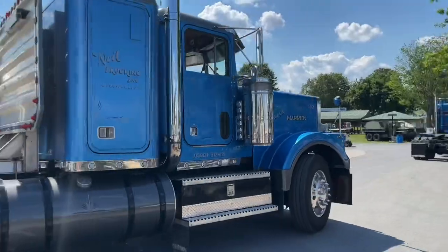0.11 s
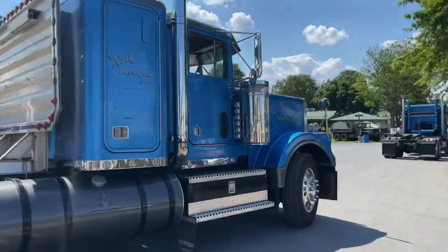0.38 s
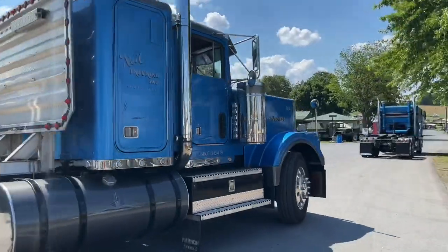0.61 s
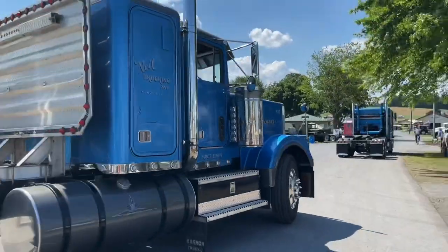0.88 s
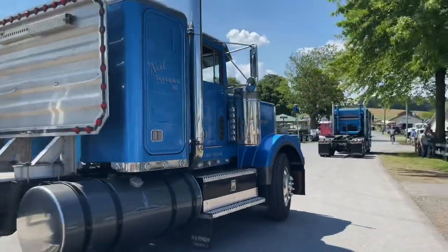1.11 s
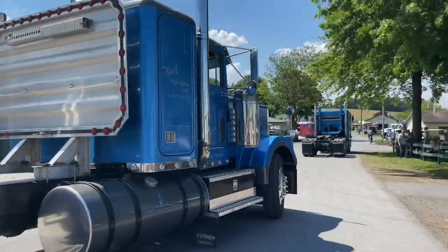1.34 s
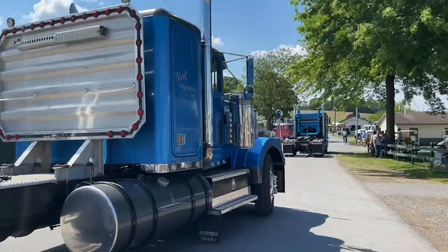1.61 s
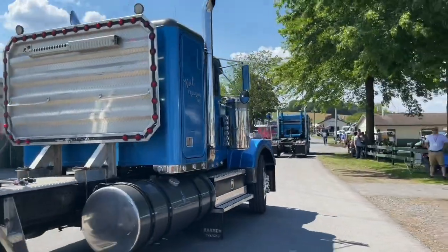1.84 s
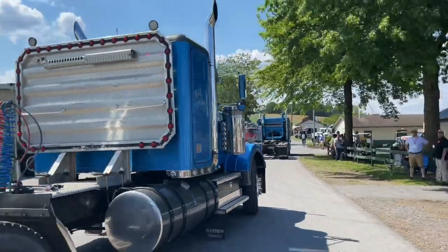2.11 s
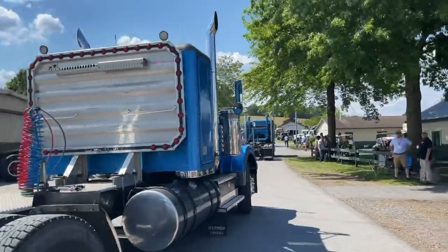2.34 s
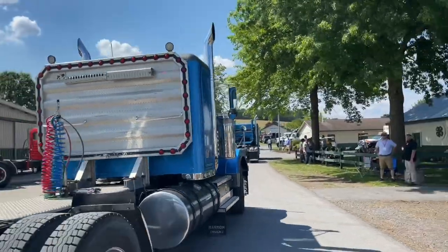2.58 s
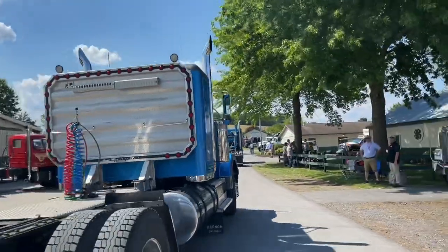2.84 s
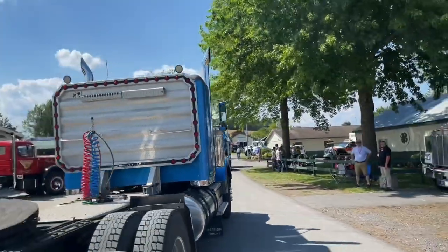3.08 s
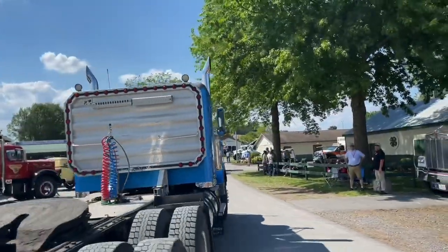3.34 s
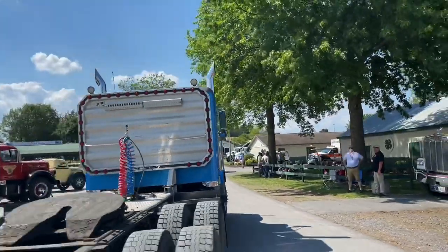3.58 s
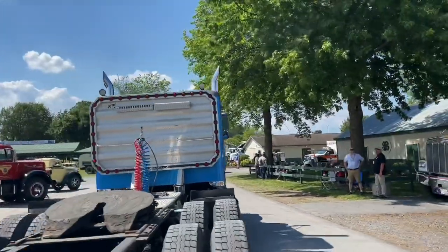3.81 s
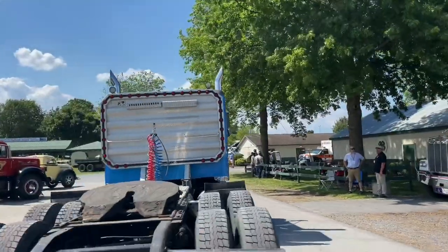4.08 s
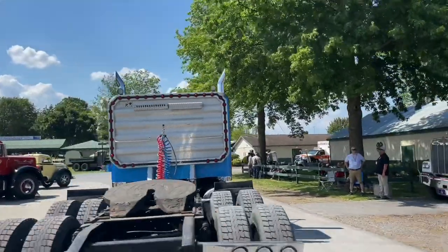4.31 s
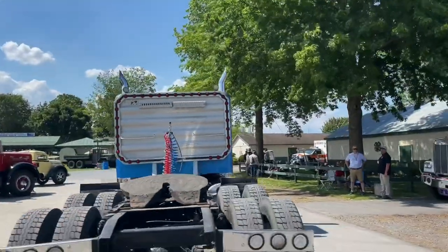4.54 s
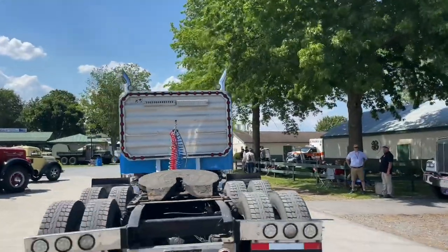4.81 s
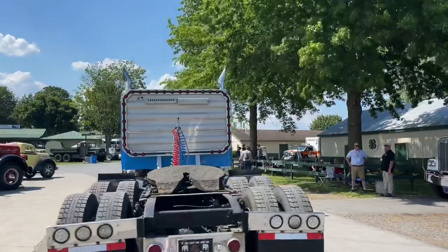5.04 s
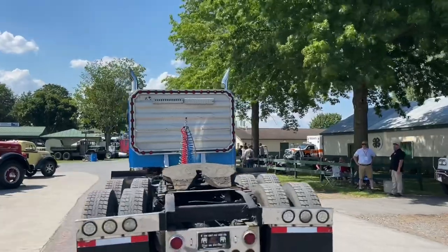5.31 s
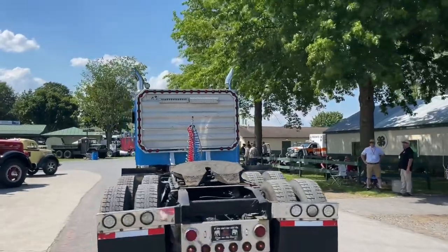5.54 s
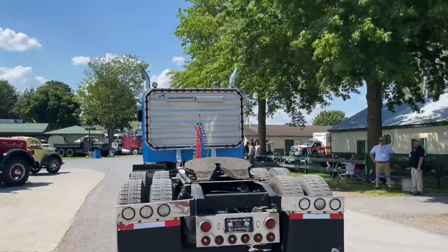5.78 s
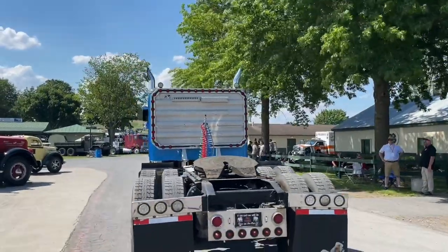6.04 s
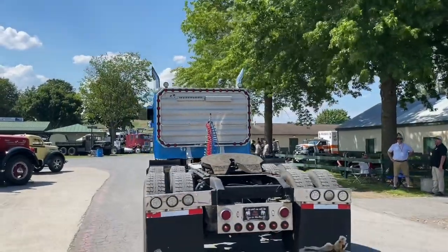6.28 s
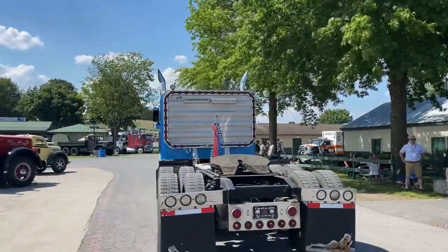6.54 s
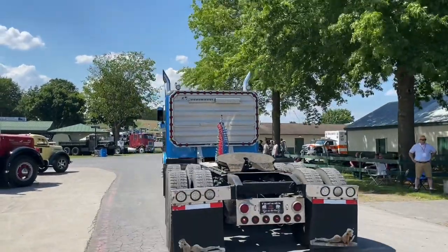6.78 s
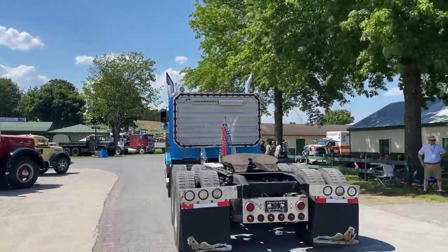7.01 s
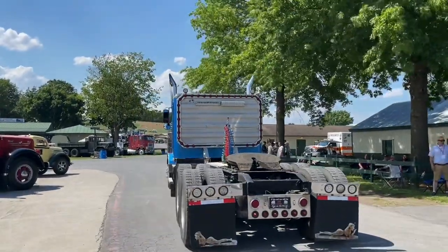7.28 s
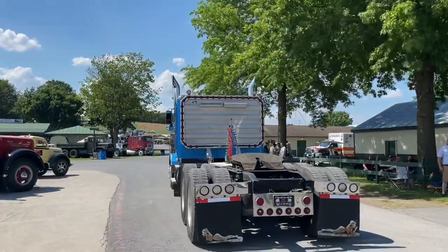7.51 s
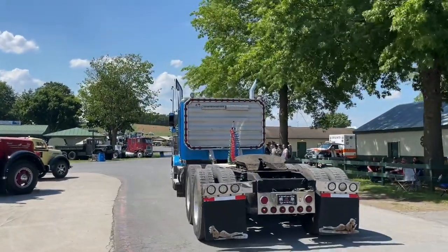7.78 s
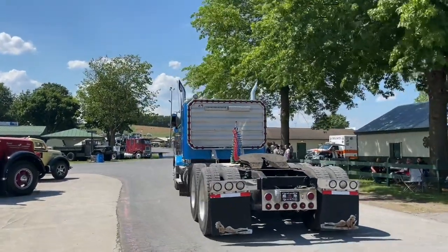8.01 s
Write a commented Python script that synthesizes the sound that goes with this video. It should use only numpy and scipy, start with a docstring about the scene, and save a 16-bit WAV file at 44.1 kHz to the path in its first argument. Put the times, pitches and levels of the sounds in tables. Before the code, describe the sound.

Outdoors, close stereo microphone beside a heavy diesel truck. At 0 s the engine growls and clatters slightly left of centre while its revs fall until about 0.7 s; a wavering gear whine follows and a thin high turbo tone sags. A second diesel drones nearby, the two low notes beating. From 0.8 to 3 s the revs climb under load, the turbo tone spools up near 2 s and fades by 3 s, and a rush of air rises. Deep exhaust swells strongly after 2 s. Dull thumps come around 2.7 and 3.2 s. At 3 s the cab hides the engine: whine weakens, clatter dulls, bass rumble thickens. Then a nearly steady, slowly rising throb continues with barking stacks, hiss and a faint swooping breathy whistle, strongest near 4.8 s. Firmer thuds land at 4.6, 4.9 and twice near 7.5 s. The rumble continues to the end at 8 s, drifting toward the middle.

```python
"""A six-cylinder diesel truck starts left of centre outdoors: its revs drop, then climb under load.
Its exhaust beats against a second diesel from the start; a gear whine follows the crank, and a
thin turbo tone sags, spools up again and fades while a rush of air rises with boost.
At three seconds the cab hides the engine and dulls it. Dull thumps come and go from shortly before
then, over roar, stack hiss and a swooping whistle, as the truck draws toward the middle."""
import sys
import numpy as np
from scipy import signal
from scipy.fft import rfft, irfft, next_fast_len
from scipy.io import wavfile
from scipy.ndimage import uniform_filter1d, map_coordinates

SR = 44100
rng = np.random.default_rng(int(sys.argv[2]) if len(sys.argv) > 2 else 0)


def natural_amplitude(level_db):
    """Convert a level in decibels to a linear amplitude factor, elementwise."""
    exponent = np.asarray(level_db, float) / 20
    return 10 ** exponent


def to_wav(sig):
    """Store sig (one row per channel, or 1-D mono) as 16-bit WAV at the path in sys.argv[1].

    Samples outside -1..1 are clipped; the rate is SR.
    """
    pcm = np.clip(np.atleast_2d(sig), -1, 1) * 32767
    pcm = np.round(pcm).astype(np.int16)
    wavfile.write(sys.argv[1], SR, pcm.T)  # frames by channels


N = 358533
T = np.arange(N) / SR  # seconds
CYLINDERS = 6
GEAR_TEETH = 80

# firing rate of the near truck: start_s, firing_hz
REVS = [(0.0, 42.72), (0.45, 33.48), (0.72, 32.4), (1.05, 36.09), (1.55, 39.86), (2.1, 48.17),
        (2.46, 50.69), (2.9, 56.84), (3.25, 57.5), (3.75, 59.96), (4.3, 60.44), (4.75, 61.61),
        (5.55, 61.71), (6.2, 62.73), (7.4, 63.65), (8.13, 65.73)]
# firing rate of the second diesel: start_s, firing_hz
REVS_SECOND = [(0.0, 48.28), (0.55, 46.48), (1.55, 54.88), (2.05, 57.15), (2.8, 57.91), (3.5, 57.37),
               (4.1, 57.59), (5.1, 54.38), (5.95, 53.03), (6.5, 52.97), (7.3, 53.54), (8.13, 53.51)]
# strength of the first exhaust harmonic: start_s, near_truck_db, second_diesel_db
EXHAUST = [(0, -41.5, -30), (.6, -44, -35), (1.2, -33, -18.5), (1.8, -27, -19), (2.1, -16, -18.5),
           (2.45, -18, -21), (2.75, -12.5, -18.5), (3, -16, -31), (3.3, -14.5, -20), (3.6, -12.5, -26),
           (4.2, -11.5, -23.5), (4.5, -11.5, -32), (5.1, -13.5, -22.5), (5.9, -12, -27),
           (6.401, -13.5, -26.5), (6.9, -14.5, -22.5), (7.25, -12.5, -26.5), (8.13, -13.5, -34)]
# overtones swell as they glide through resonances of pipe and yard: pitch_hz, over_first_harmonic_db
OVERTONES = [(65, 10), (71, -3), (79, 6.5), (92, -23.5), (101, -13), (108, -8), (115, -4), (120, -11),
             (126, -14.5), (130, -6.5), (140, -19), (151, -10.5), (163, -17.5), (171, -3), (176, -12),
             (181, -27), (186, -13), (191.5, -10.5), (194, -27), (225, -14.5), (245, -23), (265, -29.5)]
# the same for the second diesel: pitch_hz, over_first_harmonic_db
OVERTONES_SECOND = [(94, -2), (103, -7), (108, -16), (113, -8), (116, -14), (140, -10), (165, -14),
                    (175, -10.5), (190, -2.5), (210, -21.5), (235, -24.5)]
WAVER_DB = 1.2  # slow random waver of the overtones
# passing blooms of the second diesel's 2nd and 3rd harmonics: centre_s, length_s, level_db
BLOOM_SECOND = [(5.2, 0.34, -26.5), (6.9, 0.92, -28)]
BLOOM_THIRD = [(4.45, 0.352, -25)]

# three cylinder pairs bark with changing strength: start_s, first_pair_db, second_pair_db, third_pair_db
PAIRS = [(0, -40, -40, -40), (2, -34, -34, -34), (2.8, -40, -33, -38), (4, -36, -25, -31),
         (4.8, -36, -28, -27), (5.5, -33, -38, -22), (6.3, -34, -39, -20), (7.2, -33, -38, -21),
         (8.13, -36, -38, -31)]
# exhaust stack resonances: pitch_hz, width_hz, relative_db
STACK = [(260, 60, -11), (338, 24, 0), (590, 120, -15)]
# weak lines between the notes: times_per_engine_cycle (of six firings), level_db
BARK_LINES = [(9, -33.5), (15, -40.5), (17, -34)]

# engine and stack loudness over the pass, before trims: start_s, engine_nearness_db, stack_hiss_db
TRUCK = [(0, -23, -43), (.25, -23, -45.5), (.57, -25, -47.5), (1.25, -19.5, -42), (1.9, -18, -38),
         (2.12, -19, -40), (2.35, -24, -40.5), (2.58, -19, -37.5), (3.3, -23, -33.5), (3.9, -25, -37),
         (4.1, -23, -34), (4.4, -23.5, -34.5), (5.3, -23, -37), (5.5, -24.5, -38.5), (5.95, -23, -39.5),
         (6.7, -24, -40.5), (7.45, -22, -41), (8.13, -24.5, -42.5)]
# colours of the three noise layers: pitch_hz, relative_db (per Hz)
ROAR = [(25, -23.5), (45, -4.5), (100, 1), (200, -7), (320, -9.5), (470, -8.5), (700, -9.5), (1000, -15),
        (1500, -49.5), (3000, -63)]
CLATTER = [(500, -14), (1000, 4), (1400, 0), (2200, -2), (3200, -9.5), (5000, -18), (7000, -36)]
HISS = [(2500, -19.5), (4500, -9), (5700, -4), (7000, -7.5), (8900, -1), (10200, -6.5), (11400, 2),
        (12400, -7.5), (13300, -26), (14200, -28.5), (15200, -2), (15900, -18)]
CLATTER_DB, CLATTER_FOLLOWS = -30.5, 0.695  # base level, share of the engine's nearness it follows
CLATTER_RISE_DB_PER_S = .4  # clatter slowly grows again after the cab hides the engine
HIDES_S, HIDDEN_S, SHADE_DB = 2.986, 3, -3  # the cab moves in front of the engine and dulls it
RUMBLE_HZ, RUMBLE_SIDE_DB = 246.5, -3  # beside the engine the deep roar is thinner than behind the cab
SIZZLE_HZ, SIZZLE_BEAMS = 10200, 0.485  # the highest hiss beams more narrowly from the stacks
# extra path off the road, shorter as the truck draws away: start_s, delay_s
GROUND = [(0, 0.00498), (1.5, .0045), (3, 0.003397), (5.3, 0.003313), (8.13, 0.002213)]

WHINE_DB, WHINE_HIDDEN_DB = -41.5, -48  # steady gear whine, engine in view and hidden
# swells of the gear whine: centre_s, length_s, level_db
SWELLS = [(.2, .13, -31), (.92, .11, -32), (1.27, .15, -32), (2.25, .25, -40), (2.72, .12, -46),
          (3.42, 0.0324, -37.5), (3.88, .1, -45), (4.7, 0.22, -45), (5.4, 0.033, -38), (5.93, 0.123, -36),
          (7.33, 0.228, -39.5)]
# second partial of the whine, only beside the engine: centre_s, length_s, level_db
PARTIAL = [(.17, .1, -38), (1.05, .13, -41), (1.45, .2, -42)]
# thin turbo tone, sagging late after the revs and spooling up again: start_s, pitch_hz, level_db
SPOOL = [(0, 3248, -48), (.4, 2880, -45), (.7, 2640, -57), (1.6, 2300, -52), (1.88, 2510, -39),
         (2.2, 2610, -41), (2.6, 2780, -45), (2.9, 2900, -59.5)]
RUSH_DB, BOOST_S, BOOST_DB_PER_S = -43, 1.4, 15  # full rush level, time it is reached, rise before
# band of the turbo rush: start_s, centre_hz
RUSH_HZ = [(0, 3300), (1.4, 3575), (3.4, 3457), (8.13, 4096)]
# the rush overshoots as boost arrives: centre_s, length_s, level_db
SURGE = [(1.55, .25, -49)]

WHISTLE_DB = -57  # steady breathy whistle of the stacks
# two passing swells of the whistle: centre_s, length_s, level_db
WHISTLE_SWELLS = [(2.1, 0.68, -52), (4.8, 0.42, -47)]
# the whistle swoops while the truck turns: start_s, centre_hz
SWOOP = [(0, 5750), (4, 5780), (4.3, 5350), (4.7, 5800), (5.1, 5700), (5.4, 5260), (5.7, 5720)]
# chassis thumps: centre_s, length_s, level_db
BUMPS = [(2.698, .12, -25.5), (3.152, 0.086, -27.5), (4.617, 0.06, -19.5), (4.9, 0.051, -24.5),
         (7.474, 0.059, -22), (7.57, 0.052, -21)]
# colour of a thump: pitch_hz, relative_db (per Hz)
THUMP = [(30, -31), (70, 7), (150, 9), (400, 1.5), (800, -39), (2000, -59)]

# likeness of the two microphone ports: pitch_hz, likeness (1 is identical)
ALIKE = [(60, 0.89), (200, 0.88), (500, 0.973), (1000, 0.434), (2000, 0.255), (4000, 0.623), (8000, 0.682),
         (10200, 1), (12000, 1)]
# balance of the ports: pitch_hz, left_over_right_db
LEAN = [(60, -1), (200, -2.5), (400, 1), (800, 4), (2400, 1), (4500, 3.5), (8000, 1), (15000, -3)]
# phase between the ports: pitch_hz, left_leads_rad
LEAD = [(30, -1.5), (300, 0.6039), (1030, 0.54), (2410, 0.93), (3960, 0.4234), (6720, -0.02), (7580, 0.98),
        (8870, -0.14), (9730, -2.5), (10200, 6), (10700, -4.5), (11800, -5), (14200, -8.5)]
PAN_DB, PAN_DB_PER_S = 1.2054, -0.092  # left over right at the start, and its drift


def exhaust_note(hz, level_db, overtones):
    """Four clean harmonics of the firing rate; the second lags a quarter turn and steepens the wave."""
    turn = phase(hz)
    second, third, fourth = (natural_amplitude(along(overtones, k * hz) + WAVER_DB * wobble(3)) for k in (2, 3, 4))
    wave = np.cos(turn) + second * np.sin(2 * turn) + third * np.cos(3 * turn) + fourth * np.cos(4 * turn)
    return np.sqrt(2) * natural_amplitude(level_db) * wave


def near_exhaust():
    """The near truck's exhaust note, falling and then climbing with its revs."""
    return exhaust_note(curves(REVS)[0], curves(EXHAUST)[0], OVERTONES)


def bark():
    """One puff a firing rings the stack resonances; weak lines at parts of the engine cycle roughen it."""
    count = firings()
    n = np.arange(int(count[-1]))
    chance = rng.standard_normal((len(n), 2))
    # each puff comes shortly after the note's crest, with a little jitter
    when = n + .3 + .004 * chance[:, 0]
    at = np.interp(when, count, np.arange(N)).round().astype(int)
    size_db = np.array(curves(PAIRS))[n % (CYLINDERS // 2), at]
    puffs = np.bincount(at, -natural_amplitude(size_db + 1.1 * chance[:, 1]), N)
    # levels are those of an even train of 60 puffs a second
    ring = np.linalg.norm(filtered(signal.unit_impulse(N), stack_response)) * np.sqrt(60 / SR)
    lines = np.zeros(N)
    for k, db in BARK_LINES:
        turn = 2 * np.pi * k * count / CYLINDERS + rng.uniform(0, 2 * np.pi)
        lines += natural_amplitude(db + 0.71 * wobble(1.96)) * np.cos(turn)
    return filtered(puffs, stack_response) / ring + np.sqrt(2) * lines


def stack_response(f):
    """Stack resonances of alternating sign, with the deep bass and the treble rolled off."""
    pipe = 0
    for k, (centre, width, db) in enumerate(STACK):
        pipe = pipe + (-1) ** k * natural_amplitude(db) * 1j * f * width / (centre ** 2 - f ** 2 + 1j * f * width)
    soft = (1j * f / (120 + 1j * f)) ** 2 / (1 + 1j * f / 700) ** 2
    return pipe * soft


def roar():
    """Deep combustion noise, swelling once a firing, with its reflection off the road."""
    near_db = curves(TRUCK)[0]
    lope = np.cos(2 * np.pi * firings() / CYLINDERS)  # once an engine cycle
    low = rush(ROAR, 1 + 0.155 * firing_beat() + 0.0215 * lope)
    low = natural_amplitude(near_db + 1.0) * off_road(low)
    return shelf(low, RUMBLE_HZ, RUMBLE_SIDE_DB * (1 - hidden()), 0)


def clatter():
    """Valve and block noise, pulsing with the firings and shaded by the cab."""
    near_db = curves(TRUCK)[0]
    level_db = CLATTER_DB + CLATTER_FOLLOWS * (near_db - near_db.mean())
    level_db += SHADE_DB * hidden() + CLATTER_RISE_DB_PER_S * np.clip(T - HIDDEN_S, 0, None)
    gain = natural_amplitude(level_db + 0.42 * wobble(4.798))
    return gain * rush(CLATTER, 1 + 0.105 * firing_beat(), patchy_db=1.2)


def hiss():
    """Gas noise of the stacks, pulsing with the firings; its top rises and falls further than the rest."""
    hiss_db = curves(TRUCK)[1]
    high = natural_amplitude(hiss_db + 0.554 * wobble(9)) * rush(HISS, 1 + 0.074 * firing_beat(), patchy_db=2)
    return shelf(high, SIZZLE_HZ, 0, SIZZLE_BEAMS * (hiss_db - hiss_db.mean()))


def gear_whine():
    """Gear teeth mesh at a third of the firing rate times the tooth count; pitch wavers, level flickers."""
    mesh = 2 * np.pi * firings() * GEAR_TEETH / 3 + 1.14 * wobble(24)
    level = natural_amplitude(WHINE_DB + (WHINE_HIDDEN_DB - WHINE_DB) * hidden()) + swells(SWELLS)
    first = flicker() * level * np.sin(mesh)
    second = flicker() * swells(PARTIAL) * np.sin(2 * mesh)
    return np.sqrt(2) * (first + second)


def turbo_tone():
    """A thin, flickering sine follows the turbo's spool."""
    hz, db = curves(SPOOL)
    return np.sqrt(2) * flicker() * natural_amplitude(db) * np.sin(phase(hz) + 1.35 * wobble(34))


def turbo_rush():
    """Compressor air: a moving band of noise that rises with boost."""
    boost = natural_amplitude(RUSH_DB - BOOST_DB_PER_S * np.clip(BOOST_S - T, 0, None)) + swells(SURGE)
    return boost * strip(curves(RUSH_HZ)[0], width_hz=260, flutter_db=1.1)


def stack_whistle():
    """Breath in the stacks: a narrow noise band with a swooping centre."""
    level = natural_amplitude(WHISTLE_DB) + swells(WHISTLE_SWELLS)
    return level * strip(curves(SWOOP)[0], width_hz=150, flutter_db=2.5)


def bumps():
    """Short dull swells of noise as axles cross uneven ground."""
    return swells(BUMPS) * rush(THUMP, patchy_db=3.0)


def second_diesel():
    """A second exhaust note nearby, close enough in pitch to beat; two of its harmonics bloom for a while."""
    hz = curves(REVS_SECOND)[0]
    turn = phase(hz)
    bloom = swells(BLOOM_SECOND) * np.sin(2 * turn) + swells(BLOOM_THIRD) * np.cos(3 * turn)
    return exhaust_note(hz, curves(EXHAUST)[1], OVERTONES_SECOND) + np.sqrt(2) * bloom


def off_road(x):
    """A late, duller copy off the road draws a comb of peaks that slides upward."""
    dull = filtered(x, lambda hz: natural_amplitude(-10) / (1 + (hz / 1300) ** 4))
    late = np.arange(N) - curves(GROUND)[0] * SR
    return x + np.array([np.interp(late, np.arange(N), c) for c in dull])


def ports(shared, apart):
    """Two microphone ports whose likeness, balance and lead change with pitch."""
    turn = lambda hz: np.arccos(np.clip(along(ALIKE, hz), -1, 1)) / 2
    mid = filtered(shared, lambda hz: np.cos(turn(hz)))
    side = filtered(apart, lambda hz: np.sin(turn(hz)))
    half = np.array([[.5], [-.5]])
    tilt = lambda hz: natural_amplitude(half * along(LEAN, hz)) * np.exp(1j * half * along(LEAD, hz))
    return filtered(np.array([mid + side, mid - side]), tilt)


def hidden():
    """0 while the engine is in view, 1 once the cab stands before it."""
    return np.clip((T - HIDES_S) / (HIDDEN_S - HIDES_S), 0, 1)


def firings():
    """Firings of the near truck counted since the start."""
    return np.cumsum(curves(REVS)[0]) / SR


def firing_beat():
    """A cosine that peaks once a firing."""
    return np.cos(2 * np.pi * firings())


def flicker():
    """A fast random gain around 1."""
    return natural_amplitude(2.4 * wobble(26))


def rush(spectrum, gate=1, patchy_db=1.5):
    """Two coloured noises with the same random patches of gain: one the ports share, one that sets them apart."""
    z = signal.stft(gate * rng.standard_normal((2, N)), nperseg=512)[2]
    field = uniform_filter1d(rng.standard_normal(z.shape[1:]), 5, 0)
    field = uniform_filter1d(field, 12, 1)
    pair = signal.istft(z * natural_amplitude(patchy_db * unit(field)), nperseg=512)[1][:, :N]
    return unit(filtered(pair, lambda hz: natural_amplitude(along(spectrum, hz))))


def strip(hz, width_hz, flutter_db):
    """A pair of noise bands carried on a moving centre frequency, reaching width_hz to either side."""
    base = filtered(rng.standard_normal((2, 2, N)), lambda f: 1 / (1 + (f / width_hz) ** 2))
    turn = phase(hz)
    return natural_amplitude(flutter_db * wobble(6.6)) * unit(base[0] * np.cos(turn) + base[1] * np.sin(turn))


def swells(rows):
    """Bell-shaped rises of gain from centre_s, length_s, level_db rows."""
    return sum(natural_amplitude(db) * np.exp(-.5 * ((T - s) / length) ** 2) for s, length, db in rows)


def shelf(x, corner_hz, low_db, high_db):
    """Separate moving gains below and above a corner."""
    low = filtered(x, lambda hz: 1 / (1 + (hz / corner_hz) ** 4))
    return natural_amplitude(low_db) * low + natural_amplitude(high_db) * (x - low)


def filtered(x, response):
    """x times a complex response of frequency."""
    m = next_fast_len(N + 8192)
    return irfft(rfft(x, m) * response(np.fft.rfftfreq(m, 1 / SR)), m)[..., :N]


def phase(hz):
    """Running phase in radians of a gliding pitch."""
    return 2 * np.pi * np.cumsum(hz) / SR


def curves(rows):
    """One value per sample for each column after the time."""
    s, *cols = np.transpose(rows)
    return [np.interp(T, s, c) for c in cols]


def along(points, hz):
    """Pitch and value points read on a log pitch axis."""
    f, v = np.transpose(points)
    return np.interp(np.log(hz + 1), np.log(f + 1), v)


def wobble(rate):
    """A smooth random curve, rate knots a second."""
    return map_coordinates(rng.standard_normal(int(N * rate / SR) + 4), [T * rate])


def unit(x):
    """Scaled to rms 1."""
    return x / np.sqrt(np.mean(x ** 2) + 1e-20)


def scene():
    """The truck starts on the left and draws toward the middle; both exhaust notes stay centred."""
    noise = roar() + clatter() + hiss() + turbo_rush() + stack_whistle() + bumps()
    tones = bark() + gear_whine() + turbo_tone()
    scattered = natural_amplitude(-9) * np.roll(tones, 310)  # 7 ms late, off nearby trailers and walls
    passing = natural_amplitude(np.array([[.5], [-.5]]) * (PAN_DB + PAN_DB_PER_S * T))
    truck = passing * ports(noise[0] + tones, noise[1] + scattered)
    return near_exhaust() + second_diesel() + truck


def band_limit(x):
    """A steep low-pass at the top of the band."""
    return signal.sosfilt(signal.butter(12, 15890, fs=SR, output="sos"), x)


def record(dry):
    """A soft ceiling just below full scale rounds off the peaks."""
    held = dry / (1 + np.abs(dry / .97) ** 6) ** (1 / 6)
    return band_limit(held)


dry = scene()
out = record(dry)
to_wav(out)
```